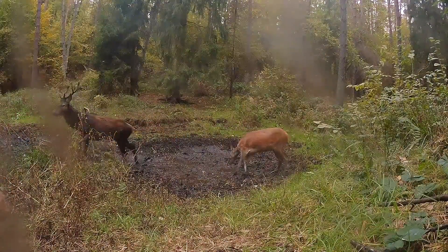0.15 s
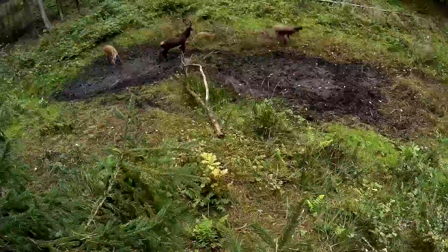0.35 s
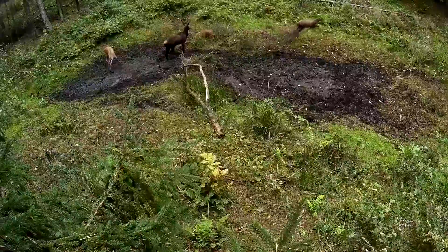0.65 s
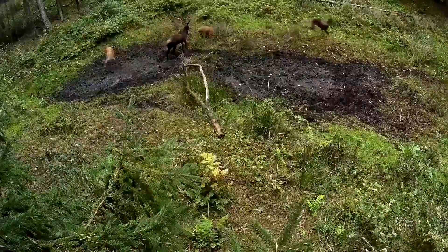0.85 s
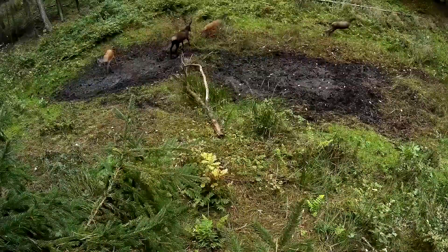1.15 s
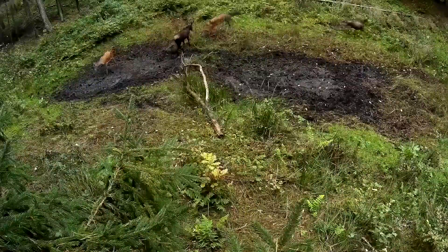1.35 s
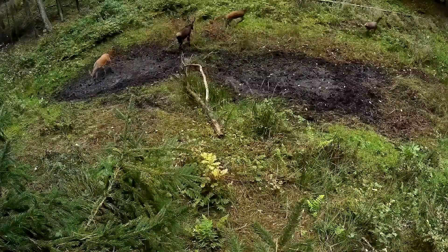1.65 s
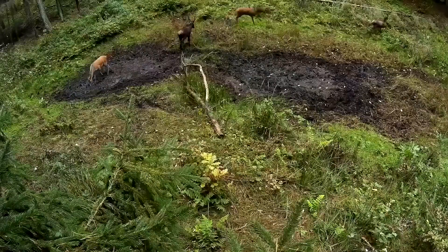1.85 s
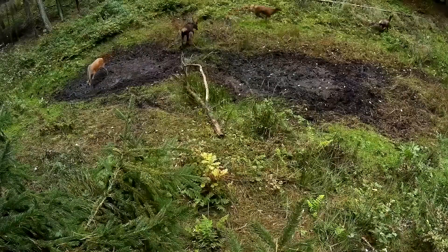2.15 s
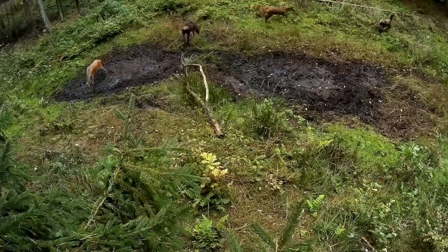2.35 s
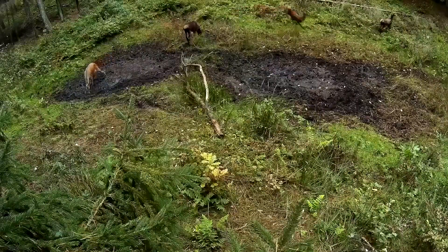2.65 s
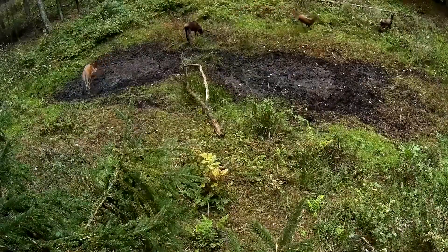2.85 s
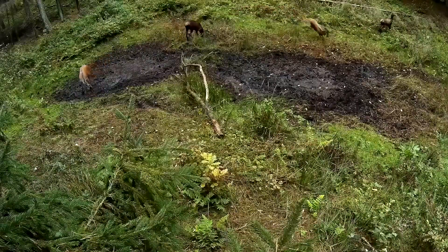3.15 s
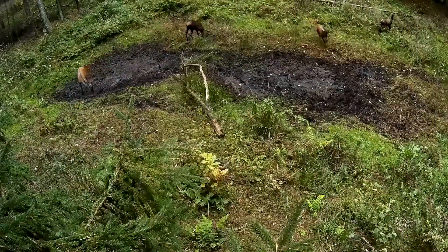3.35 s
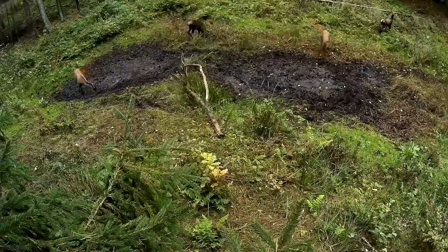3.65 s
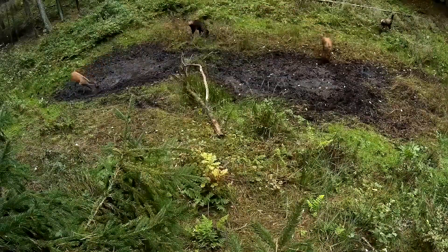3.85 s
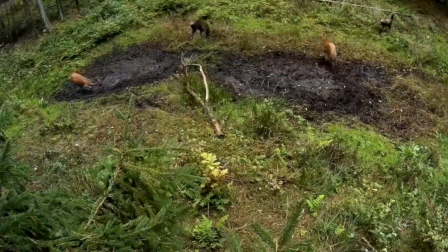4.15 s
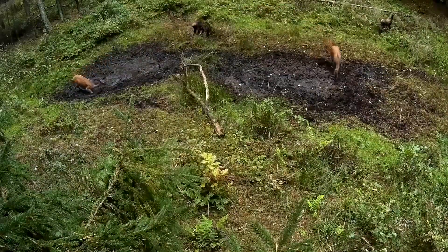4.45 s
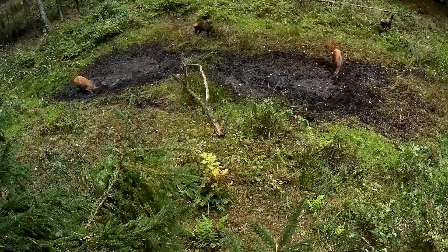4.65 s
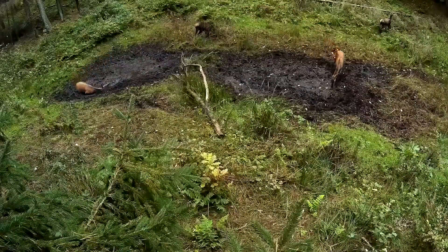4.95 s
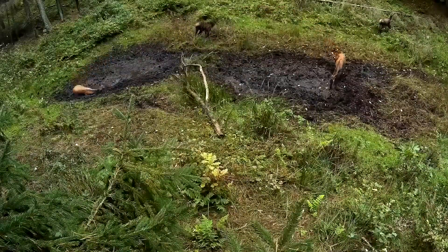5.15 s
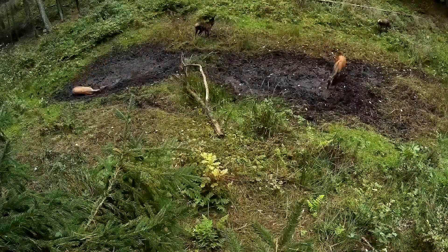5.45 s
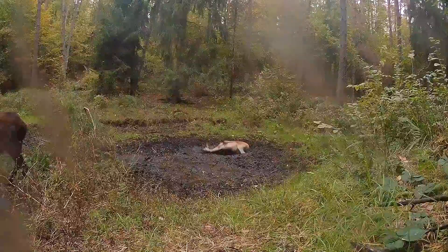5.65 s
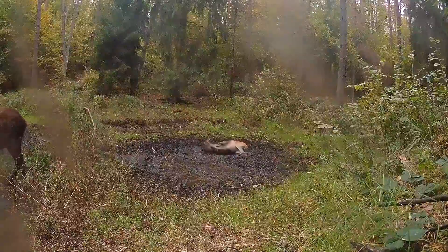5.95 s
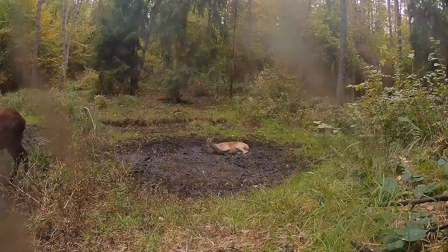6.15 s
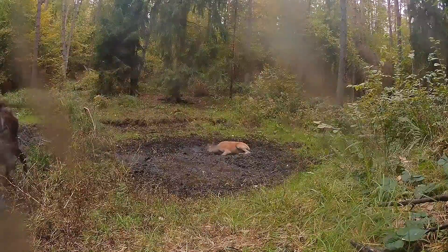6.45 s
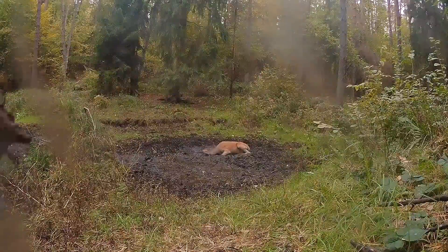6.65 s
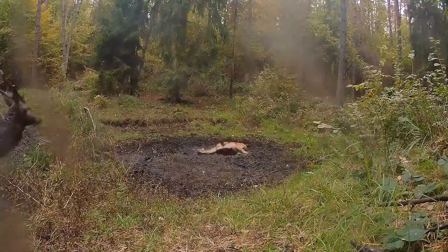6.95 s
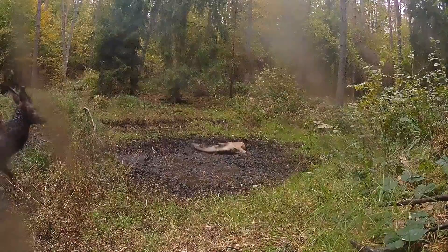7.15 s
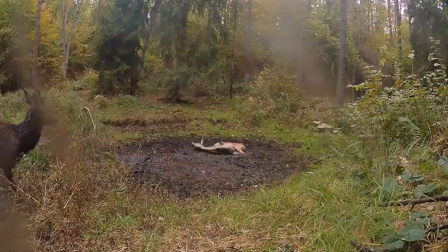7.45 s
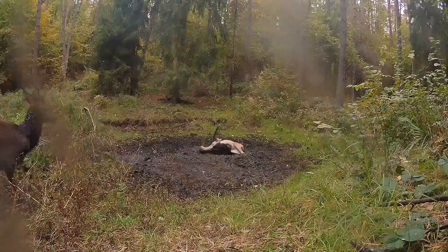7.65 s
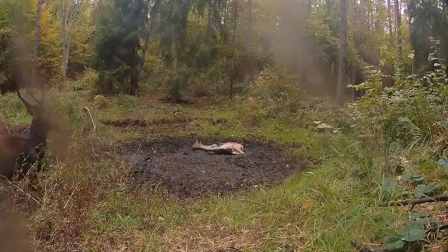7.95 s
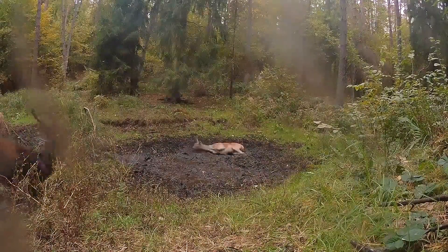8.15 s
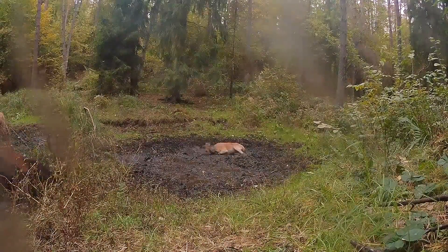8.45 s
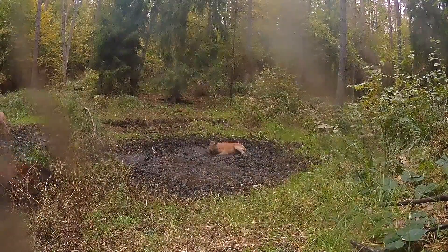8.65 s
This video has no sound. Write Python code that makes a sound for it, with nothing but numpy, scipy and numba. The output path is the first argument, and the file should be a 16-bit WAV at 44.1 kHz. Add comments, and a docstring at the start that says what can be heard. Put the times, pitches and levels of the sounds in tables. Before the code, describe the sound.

Wet, crackly movement of deer stepping, lying down and rolling in mud. Hard cracks come first with busy plopping, then a quieter stretch of fine rustling, ticks and small squelches, then stronger snaps and a hollow pocket knock, ending in dense crackling and bubbling. Open woodland with only a short scatter from the trunks; a small camera microphone adds steady hiss and a faint low buzz, dipping after loud hits.

```python
"""Deer step, lie down and roll in a muddy forest wallow, heard by a small fixed camera nearby.
Twigs and stalks snap and air pockets plop as volleys of damped rings; single gliding rings make singing
bubbles, short high droplet blips and one hollow pocket knock; pressed mud squelches in dense tiny rings.
Wet litter rustles as random ticks through resonances, over gurgling clusters of rings.
The camera adds a frame-rate buzz and hiss, ducks after loud sounds and clips the loudest snaps."""
import sys
import numpy as np
from scipy import signal
from scipy.fft import rfft, irfft
from scipy.io import wavfile
from scipy.ndimage import uniform_filter1d
from numba import njit

SR = 44100
rng = np.random.default_rng(int(sys.argv[2]) if len(sys.argv) > 2 else 0)


def waveform_to_disk(signal):
    """Save audio, clipped to [-1, 1], as 16-bit WAV at the path in sys.argv[1]."""
    frames = np.transpose(np.atleast_2d(signal))
    scaled = np.clip(frames, -1, 1) * 32767
    samples = np.round(scaled).astype(np.int16)
    wavfile.write(sys.argv[1], SR, samples)


N = 388505
TOP_HZ = 14600  # upper edge of the camera's sound
LEAD_S = .05  # room before the peak of a burst
RISE_SHARE = .05  # longer breaks build longer, by this share of their decay


def undb(db):
    """Decibels to amplitude."""
    return 10 ** (np.asarray(db) / 20)


def unit(x):
    """Scale to rms 1."""
    return x / np.sqrt(np.mean(x ** 2))


def band(x, hz, width):
    """Resonant band-pass, gain 1 at the centre."""
    b, a = signal.iirpeak(min(hz, .45 * SR), hz / width, fs=SR)
    return signal.lfilter(b, a, x)


@njit
def grains(n, start, hz, t60, size, rise, glide):
    """Damped rings that swell for rise cycles and slide in pitch by the share glide over their life."""
    y = np.zeros(n)
    for k in range(len(start)):
        life = int(t60[k] * SR) + 2
        step = np.exp(2j * np.pi * hz[k] / SR - np.log(1000.) / life)  # turn and decay per sample
        bend = np.exp(2j * np.pi * glide * hz[k] / SR / life)
        swell = np.exp(-hz[k] / (rise * SR))
        z, gate, first = size[k] + 0j, 1., int(start[k] * SR)
        for i in range(first, min(first + life, n)):
            z, step, gate = z * step, step * bend, gate * swell
            y[i] += z.imag * (1 - gate)
    return y


@njit
def follow(x, attack, release):
    """Level detector: quick up, slow down."""
    level, out = 0., np.empty(len(x))
    for i in range(len(x)):
        level += (abs(x[i]) - level) * (attack if abs(x[i]) > level else release)
        out[i] = level
    return out


def burst(hz, rise_ms, t60_ms, spread, cycles, glide, count):
    """One break as a volley of short rings that builds, then dies away; peak 1, close to LEAD_S."""
    u, g = rng.random((count, 3)).T, rng.standard_normal(count)
    early = u[2] < .3
    ms = np.where(early, -1.5 * rise_ms, .6 * t60_ms) * u[0] ** 1.5
    db = np.where(early, 12 * ms / rise_ms, -60 * ms / t60_ms)
    pitch = np.clip(hz * np.exp(spread * g), 120, TOP_HZ)
    sign = np.sign(u[1] - .5)
    size = sign * undb(db) * pitch / hz  # long low rings start weaker, so the colour stays at hz
    start = np.maximum(LEAD_S + ms / 1000 - 1 / pitch, 0)
    y = grains(int(.2 * SR), start, pitch, cycles / pitch, size, 0.41, glide)
    return y / np.abs(y).max()


def add(out, s, y):
    """Mix y into out from time s."""
    i = int(s * SR)
    y = y[max(-i, 0):len(out) - i]
    out[max(i, 0):max(i, 0) + len(y)] += y


def crackle(rate, scatter_db):
    """Clicks at random moments, rate a second on average, a few much larger than the rest."""
    clicks = (rng.random(N) < rate / SR) * rng.standard_normal(N)
    return clicks * undb(scatter_db * rng.exponential(size=N))


def flicker(rate, depth_db):
    """Gain that wanders rate times a second."""
    k = int(SR / rate)
    steps = np.repeat(rng.standard_normal(N // k + 1), k)[:N]
    return undb(depth_db * uniform_filter1d(steps, k))


# twigs and stalks breaking: start_s (of the peak) [s], level_db (peak of the ringing volley) [dB],
# pitch_hz (ring centre) [Hz], decay_ms (t60, at least 3 is used) [ms], crack_db (treble, re level) [dB]
BREAKING_TWIGS = [(0.015, -26, 4840, 8.8, 3.5), (0.082, -24, 2340, 42, 1), (0.2017, -19, 3100, 4.6, -7),
                  (0.217, -24, 1850, 17, -20), (0.4162, -23.5, 2700, 35, -4), (0.462, 2, 4776, 10.6, -9),
                  (0.633, -34, 3520, 13, -3), (0.7214, -20.5, 7230, 7, 1), (0.744, -18, 5580, 12, -7),
                  (0.7685, -25.5, 4220, 29, -8), (0.909, -32, 5400, 11, -10), (1.116, -23.5, 4340, 68, 4.5),
                  (1.1284, -24, 4500, 18, -10), (1.1442, -29, 4240, 17, -19), (1.1594, -17, 5460, 23, -15),
                  (1.1663, 0, 5460, 23.6, -17), (1.209, -21, 5900, 13.6, -17), (1.3222, -27, 5450, 14, -17),
                  (1.348, -18, 6730, 3.9, -21), (1.4102, -22, 4600, 8.3, -6), (1.4233, -30, 5700, 16, -5),
                  (1.47, -21, 4270, 7.1, -1.5), (1.5733, -21, 5200, 24, -23), (1.698, -18, 4870, 23.5, -5),
                  (1.92, -28, 3600, 34, -18), (1.957, -27, 4400, 33, -23), (1.848, -29.5, 5050, 17, -8),
                  (2.043, -29.5, 4800, 17.5, 4), (2.191, -33, 4300, 10, -15), (2.46, -26.5, 4450, 10, -6),
                  (2.3762, -26.5, 4320, 15, -6.5), (2.54, -24, 3530, 19, -13),
                  (2.5548, -23.5, 5500, 13.5, -1), (2.611, -25, 4370, 26, 3), (2.717, -28.5, 2410, 10, -24),
                  (2.84, -34, 4320, 18, -18), (2.867, -21, 3870, 8, -24), (3.052, -26.5, 4500, 50, -9),
                  (3.1339, -25, 5700, 24, -3), (3.3903, -16.5, 4320, 26, -8), (3.4048, -29, 3940, 80, -22),
                  (3.4578, -25.5, 5980, 14, 1), (3.7906, -18.5, 5330, 49, -14),
                  (4.1382, -20.5, 4520, 58, 0), (4.5568, -20.5, 3970, 30, -12),
                  (4.5804, -17.5, 4200, 13.7, -3), (4.632, -24.5, 4280, 17, -17),
                  (4.7007, -22, 3510, 12, -7), (4.779, -13.5, 5500, 7.1, -30),
                  (5.0639, -21.5, 3970, 21, -9), (5.0764, -26, 5440, 17, -23), (5.182, -28, 6400, 32, -13),
                  (5.5254, -35, 3640, 7.8, -7), (5.5378, -23, 3780, 21, -27),
                  (5.5773, -21.5, 4200, 13, -28), (6.666, -30, 3300, 22, -20),
                  (5.5919, -16.5, 2560, 14, -8), (5.709, -27.5, 1750, 43, -26.5),
                  (5.64, -28.5, 6350, 11, -16), (5.758, -28, 2920, 35, -11), (5.672, -33, 1800, 22, -16),
                  (5.794, -25.5, 2300, 30, -20), (5.801, -22, 4270, 26.5, -1), (5.817, -24.5, 4100, 77, -5),
                  (5.853, -31, 4660, 15, -13), (5.8771, -9.5, 5460, 14.1, -3), (6.0068, 1, 2650, 8, -7),
                  (6.1908, -2.5, 4000, 12.9, -3), (6.3077, -27, 7900, 11, 7), (6.3315, -8, 4460, 6.7, -1),
                  (6.425, -24, 4530, 33, -21), (6.6868, -18, 5230, 22.6, -9), (6.829, -24, 6530, 27, -2.5),
                  (6.968, -32.5, 2360, 30, -15), (7.148, -43, 2250, 22, -25),
                  (6.9993, -15, 5170, 26.4, -21), (7.008, -19.5, 3700, 19.4, -16.5),
                  (7.06, -24.5, 6260, 17, -6), (7.286, -23, 4370, 37, -7), (7.3099, -22.5, 3500, 24, -8),
                  (7.4094, -18.5, 4930, 6.1, -3.5), (7.4548, -18, 3070, 11.2, -8),
                  (7.468, -21, 3920, 16.6, -3), (7.485, -30, 3960, 11, -19), (7.509, -21.5, 3470, 30, -9),
                  (7.5596, -30, 2300, 13, -20), (7.619, -27.5, 3700, 20, -21), (7.674, -24, 3720, 15.3, -2),
                  (7.8223, -11.5, 6520, 7.3, 1.5), (7.8365, -16, 4360, 35, -3),
                  (7.978, -23.5, 5880, 16, -22), (8.1044, -17.5, 5260, 17.3, -0.5),
                  (8.234, -20, 6800, 9.1, -24), (8.3012, -22.5, 4100, 10, -1.5),
                  (8.3148, -15, 3700, 4.4, -12), (8.347, -20, 4530, 11, -18),
                  (8.453, -15.5, 4710, 14, -28.5), (8.49, -21.5, 3360, 23, -9),
                  (8.528, -22.5, 3400, 27, -28), (8.617, -19.5, 4160, 19, -25),
                  (8.633, -17, 5160, 46, -7.5), (8.641, -31, 2100, 21, -27), (8.72, -33, 2230, 40, -25),
                  (8.665, -23.5, 4050, 27, -15), (8.697, -15, 4600, 7.6, -9)]


def snaps():
    """Fibres give way one after another: a ringing volley and a short treble crack."""
    out = np.zeros(N)
    for start_s, level_db, pitch_hz, decay_ms, crack_db in BREAKING_TWIGS:
        rise_ms = max(.8 + RISE_SHARE * decay_ms, .2)
        decay_ms = max(decay_ms, 3)
        body = burst(pitch_hz, rise_ms, decay_ms, spread=.24, cycles=12.8, glide=0.026, count=40)
        crack = burst(9000, 1.1 * rise_ms, decay_ms, spread=0.2, cycles=3.64, glide=0., count=60)
        add(out, start_s - LEAD_S, undb(level_db) * (body + undb(crack_db) * crack))
    return out


# air pockets bursting as hooves and flanks leave the mud: start_s (of the peak) [s],
# level_db (before the mix of three layers) [dB], pitch_hz [Hz], decay_ms (t60, at least 6 is used) [ms]
AIR_POCKETS = [(0.1474, -29.5, 515, 34), (0.268, -37, 480, 40), (.311, -38, 480, 30),
               (0.4168, -21, 980, 27), (.419, -28, 487, 35), (0.4634, -19, 990, 19), (.619, -40.5, 277, 27),
               (1.066, -29, 620, 34), (1.116, -24, 950, 72), (1.1648, -17, 1120, 16),
               (1.125, -22, 1160, 25.7), (1.252, -31, 665, 69), (1.4618, -30.5, 556, 27),
               (1.4783, -29, 920, 54), (1.4974, -29.5, 780, 40), (1.574, -22, 830, 17.3),
               (1.6045, -26.5, 1200, 19), (1.697, -20.5, 852, 37), (1.961, -40, 300, 31),
               (2.281, -34, 644, 36), (2.0937, -30, 546, 19), (2.1551, -31.5, 480, 44),
               (2.303, -30.5, 570, 26), (2.909, -33.5, 690, 19), (3.05, -31, 795, 38),
               (3.0682, -30, 663, 5.6), (3.45, -34.5, 793, 29), (3.756, -41, 446, 36),
               (3.793, -34, 980, 29), (4.139, -33.5, 1440, 16), (4.17, -41, 860, 28), (4.41, -33, 1350, 28),
               (4.4187, -30, 730, 22.4), (4.5352, -27, 550, 73), (4.581, -29.5, 645, 9),
               (4.811, -30.5, 420, 43), (5.0249, -28.5, 830, 32.6), (5.496, -35, 1060, 31),
               (5.5937, -29.5, 1180, 14), (5.621, -38, 1040, 40), (5.672, -34.5, 1150, 29),
               (5.8024, -31.5, 533, 35), (5.82, -35.5, 500, 55), (5.8776, -21, 1880, 15.7),
               (6.009, -20, 527, 13), (6.0574, -29, 1030, 35), (6.27, -39.5, 510, 40),
               (6.43, -33, 840, 27.6), (6.5082, -30.5, 680, 54), (6.6114, -23, 800, 33),
               (6.6864, -27.5, 1100, 10.4), (7.0062, -30, 958, 30), (7.009, -23, 2050, 20),
               (7.0751, -34, 720, 19), (7.1456, -31.5, 940, 17.4), (7.188, -27, 1060, 18),
               (7.3123, -35.5, 463, 35), (7.259, -37, 1110, 22), (7.455, -26, 1440, 9.7),
               (7.4684, -32, 945, 30), (7.5114, -28.5, 1150, 11.7), (7.659, -39, 910, 28),
               (7.816, -32, 910, 15), (7.838, -26.5, 604, 19), (7.9994, -34, 1030, 17),
               (8.103, -33.5, 675, 47), (8.316, -33.5, 443, 22.6), (8.43, -38.5, 1100, 18),
               (8.665, -39, 1300, 14), (8.4905, -18, 930, 17), (8.492, -23.5, 440, 30),
               (8.53, -38, 905, 28), (8.7, -35, 830, 37)]


def plops():
    """A cavity breaks into many pockets: it rings at its pitch, in a near core and a wide, rough slurp."""
    out = np.zeros(N)
    for start_s, level_db, pitch_hz, decay_ms in AIR_POCKETS:
        rise_ms = max(1.48 + RISE_SHARE * decay_ms, .5)
        decay_ms = max(decay_ms, 6)
        cavity_cycles = .6 * pitch_hz * decay_ms / 1000
        cavity = burst(pitch_hz, rise_ms, .3 * decay_ms, spread=.04, cycles=cavity_cycles,
                       glide=.15, count=3)
        core = burst(pitch_hz, rise_ms, decay_ms, spread=0.17, cycles=7.8, glide=0.29, count=10)
        slurp = burst(pitch_hz, 1.59 * rise_ms, 1.8 * decay_ms, spread=0.51, cycles=10.7,
                      glide=0.3, count=40)
        plop = undb(-5.5) * cavity + undb(-2.5) * core + undb(-5.5) * slurp
        add(out, start_s - LEAD_S, undb(level_db) * plop)
    return out


# single gliding rings (singing bubbles, short high droplet blips and one hollow pocket knock):
# start_s [s], level_db (before swell and decay) [dB], pitch_hz (at the start) [Hz],
# decay_s (t60) [s], swell_cycles [cycles], glide (pitch change over the decay) [share of the pitch]
SINGLE_RINGS = [(2.716, -36, 764, 0.065, 1.7, 0.1), (2.745, -52.5, 846, 0.073, 4, -3),
                (6.0058, -3.5, 1430, 0.031, 0.46, 0.2), (6.619, -33, 490, 0.17, 6.9, 1),
                (7.206, -24, 726, 0.052, 8.5, 2), (8.048, -27, 4730, 0.02, 5, .0),
                (8.069, -29, 3900, .018, 5, -0.5), (7.348, -32.5, 740, 0.05, 1.8, 1),
                (8.705, -43.5, 389, 0.27, 10, 0.7), (8.755, -39, 470, 0.2, 15, -0.2)]


def gliding_rings():
    """A bubble, droplet or pocket is one gliding ring; thick mud chokes it, so longer ones waver more."""
    out = np.zeros(N)
    waver = flicker(90, depth_db=5)
    for start_s, level_db, pitch_hz, decay_s, swell_cycles, glide in np.array(SINGLE_RINGS):
        start, pitch, decay, size = np.array([[start_s], [pitch_hz], [decay_s], [undb(level_db)]])
        ring = grains(N, start, pitch, decay, size, swell_cycles, glide)
        out += waver ** min(decay_s / .1, 1) * ring
    return out


# mud pressed out under a hoof or flank: start_s [s], length_s [s], level_db (rms) [dB], pitch_hz [Hz]
PRESSED_MUD = [(1.464, 0.05, -36, 3500), (2.045, 0.031, -42, 4600), (2.277, .03, -39.5, 3900),
               (2.606, .016, -33.5, 4370), (8.097, 0.013, -35, 4170), (2.835, 0.053, -43.5, 4300),
               (3.396, 0.042, -41.5, 3930), (5.501, 0.031, -46, 3930), (5.759, 0.099, -40, 4040),
               (6.325, 0.038, -39.5, 4000), (6.494, .045, -44, 3850), (7.438, 0.067, -45.5, 3760),
               (8.295, 0.057, -38.5, 4050), (8.517, 0.02, -39, 3650), (8.617, 0.028, -38, 4220)]


def squelches():
    """Pressed mud spits a dense run of tiny pockets near one pitch, then stops short."""
    out = np.zeros(N)
    for start_s, length_s, level_db, pitch_hz in PRESSED_MUD:
        u, g = rng.random(120), rng.standard_normal((120, 2)).T
        pitch = pitch_hz * np.exp(0.13 * g[0])
        size = undb(8.3 * g[1] - 4 * u)  # uneven pockets, weaker towards the end
        y = grains(int(.2 * SR), length_s * u, pitch, 22 / pitch, size, 0.77, 0.14)
        rms = np.sqrt(np.sum(y ** 2) / (length_s * SR))
        add(out, start_s, undb(level_db) * y / rms)
    return out


# steps and rolls through mud, grass and wet litter, levels before the layer trims in rustle():
# start_s (of the peak) [s], fade_s (to fall 10 dB, at least 0.01 is used) [s],
# gurgle_db [dB], stalks_db [dB], spray_db [dB]
STEPS_AND_ROLLS = [(0.03, 0.08, -42.5, -37.5, -40), (0.16, 0.12, -60, -36.5, -33.5),
                   (0.33, 0.5, -50, -59.5, -65), (0.568, 0.01, -74, -34, -30), (0.64, -0.2, -58, -37, -53),
                   (0.73, 0.37, -55, -42, -43), (0.81, -3.5, -74, -55, -53), (0.92, 0.7, -62, -59, -48),
                   (1.1, 0.17, -48, -45, -43), (1.35, 0.5, -72, -62, -48), (1.476, 0.03, -34.5, -35, -37.5),
                   (1.59, .08, -45.5, -41.5, -39), (1.8, -0.84, -55, -45.5, -42.5),
                   (1.938, 0.22, -54, -46, -44.5), (2.06, 0, -52.5, -36, -44),
                   (2.167, 0.07, -51, -40.5, -39.5), (2.291, 0.07, -43, -43.5, -43),
                   (2.4, -0.33, -46, -39, -42), (2.51, 0.14, -52.5, -38.5, -35.5),
                   (2.65, 0.1, -53, -43.5, -46), (2.85, 0.07, -53.5, -47, -44.5),
                   (2.911, -0.0734, -38, -34.5, -32.5), (3.069, -0.04, -49, -43, -54),
                   (3.13, 0.2, -67, -56, -47.5), (3.402, -0.09, -46, -38, -57), (3.47, 0.07, -48, -40, -38),
                   (3.62, 0.63, -58.5, -49, -45), (3.76, 0, -43.5, -47.5, -40),
                   (3.95, 0.19, -47.5, -44.5, -41.5), (4.16, 0.15, -48, -48, -39),
                   (4.409, 0.1, -49, -45, -37), (4.54, 0.15, -61, -49, -43.5),
                   (4.798, 0.2, -49.5, -43.5, -41), (5.019, -0.21, -47, -36, -54),
                   (5.19, -0.13, -50, -45, -36), (5.32, 0, -61, -47, -37), (5.39, 0.15, -48, -44.5, -47),
                   (5.52, 0.53, -52.5, -57, -77), (5.62, 0.28, -51.5, -55, -52),
                   (5.766, -0.05, -41, -35.5, -37.5), (5.82, 0.04, -43, -47, -37.5),
                   (6.06, 0.22, -44, -43.5, -52), (6.131, -0.1, -52, -36, -34),
                   (6.29, -0.09, -39, -34, -35), (6.35, 0.17, -54.5, -45, -43),
                   (6.45, 0.16, -56, -48, -41.5), (6.519, 0.13, -53, -38.5, -66),
                   (6.6, 0.05, -45, -45, -45), (6.69, 0.11, -49.5, -39, -44.5),
                   (7.01, 0.1, -43.5, -42, -39), (7.15, 0.17, -47.5, -42, -43.5),
                   (7.279, -0.01, -39, -37, -33.5), (7.459, 0.09, -49.5, -38, -41.5),
                   (7.661, 0.13, -45, -43, -44.5), (7.75, -0.04, -47.5, -42, -41),
                   (7.828, 0.1, -49, -37.5, -40), (7.88, 0.1, -72, -62, -44),
                   (7.99, -0.42, -71, -45, -38.5), (8.12, 0.13, -65, -47, -42),
                   (8.19, -0.03, -49, -50, -37), (8.328, 0.15, -57, -56, -48),
                   (8.411, 0.16, -58, -43, -38.5), (8.49, 0.1, -43, -43, -56), (8.63, 0.3, -56, -47, -52),
                   (8.7, 0, -49, -36, -47)]
# quiet bed between movements, before the same trims: gurgle_db [dB], stalks_db [dB], spray_db [dB]
QUIET_BED = [-68, -57.5, -51]
SWELL_SHARE = 0.73  # a movement swells in this share of its fade


def moves():
    """Levels in dB of gurgle, stalks and spray: each movement swells and fades over a quiet bed."""
    t = np.arange(0, N / SR + .01, .002)
    power = 0
    for start_s, fade_s, *levels_db in STEPS_AND_ROLLS:
        distance = np.where(t < start_s, (start_s - t) / SWELL_SHARE, t - start_s)
        lost_db = 10 * (distance / max(fade_s, .01))
        power = power + undb(np.array(levels_db)[:, None] - lost_db) ** 2
    level_db = 10 * np.log10(power + undb(QUIET_BED)[:, None] ** 2)
    return [np.interp(np.arange(N) / SR, t, db) for db in level_db]


def smacks(low_hz, span, cycles, scatter_db, spread_ms, count, size):
    """Small wet breaks at random moments, each a cluster of rings near its own pitch; rms 1."""
    u, v = rng.random((count, 3)).T, rng.random((count, size, 3))
    start = u[0, :, None] * N / SR + spread_ms / 1000 * v[..., 0] ** 2
    hz = low_hz * span ** u[1, :, None] * np.exp(.5 * (v[..., 1] - .5))
    smack_db = np.minimum(-scatter_db * np.log(u[2, :, None]), 7)  # few are large, none beyond a cap
    db = smack_db - 3.9 * v[..., 0]
    gain = undb(db) * np.sqrt(hz / low_hz)  # short high rings carry as much energy as long low ones
    t60 = cycles * (0.37 + v[..., 2]) / hz
    return unit(grains(N, start.ravel(), hz.ravel(), t60.ravel(), gain.ravel(), 0.3, 0.26))


def gurgle():
    """Bubbles in the mud: a froth of single rings and clusters of longer ones."""
    froth = smacks(210.7, 9.3, cycles=7.3, scatter_db=4.5, spread_ms=3.05, count=5000, size=1)
    clusters = smacks(428.3, 4.45, cycles=35.4, scatter_db=4.0, spread_ms=14, count=800, size=3)
    return undb(-5) * froth + undb(-5.5) * clusters


def ringing_ticks(modes, shared, fine_db):
    """Dense ticks of stalks or droplets ring resonances, each with its own ticks besides the shared."""
    layer = 0
    for pitch_hz, width_hz, level_db in modes:
        own = crackle(2500, scatter_db=2.0) * flicker(60, depth_db=1.5) * flicker(13, depth_db=1.0)
        ring = unit(band(band(shared + own, pitch_hz, width_hz), pitch_hz, width_hz))
        treble_db = fine_db * max(np.log2(pitch_hz / 6500), 0)
        layer = layer + undb(level_db + treble_db) * ring
    return layer


def swish():
    """One bright sweep through dry grass tips: a bell-shaped swell of high band noise."""
    swell = np.exp(-((np.arange(N) / SR - 2.5) / 0.083) ** 2)
    return undb(-43) * swell * unit(band(rng.standard_normal(N), 11000, 6000))


# where brushed stalks ring at the camera's port: pitch_hz [Hz], width_hz (of each of two passes) [Hz],
# level_db (within the layer) [dB]
STALK_RINGS = [(2140, 780, -2.5), (3490, 830, 0), (4540, 700, -1.5)]
# where fine spray rings there: pitch_hz [Hz], width_hz (of each of two passes) [Hz],
# level_db (within the layer, before the treble opens) [dB]
SPRAY_RINGS = [(5150, 2200, 0.5), (6720, 2800, -1.5), (8830, 4400, -4.5), (12000, 1200, -14)]


def rustle():
    """Gurgle, wet smacks, and ticks of stalks and droplets follow the movements and surge together."""
    gurgle_db, stalks_db, spray_db = moves()
    shared, surge = crackle(1500, scatter_db=2.0), flicker(60, depth_db=2.5)
    stalk_smacks = smacks(3000, 1.9, cycles=20, scatter_db=3.5, spread_ms=3.0, count=1600, size=4)
    spray_smacks = smacks(4460, 2.22, cycles=32.0, scatter_db=3.5, spread_ms=5.0, count=1300, size=9)
    fine_db = .5 * (spray_db - stalks_db)  # where spray outweighs stalks the top octave opens
    out = undb(gurgle_db) * gurgle()
    out += undb(stalks_db - 5) * stalk_smacks
    out += undb(spray_db - 12.5) * spray_smacks
    out += undb(stalks_db - 8.5) * ringing_ticks(STALK_RINGS, shared, fine_db)
    out += undb(spray_db - 7) * ringing_ticks(SPRAY_RINGS, shared, fine_db)
    return surge * (out + swish())


def buzz():
    """Supply current switches on and off once a frame and leaks in as a down and an up spike."""
    frame_hz, load_on_s, load_off_s = 29.97, .0099, .0202
    t = np.arange(N) / SR
    spikes = 0
    for at, sign in ((load_on_s, -1), (load_off_s, .88)):
        since = (t - at) % (1 / frame_hz)
        spikes = spikes + sign * (np.exp(-since / 0.0014) - np.exp(-since / 0.0005))
    level_db = -37.5 - 2.5 * (t > 6.2)  # the buzz is weaker from 6.2 s on
    return undb(level_db) * spikes * flicker(36, depth_db=2.5)


# colour of the camera's steady hiss: pitch_hz [Hz], level_db (relative density per Hz) [dB]
HISS_COLOUR = [(59, -23), (100, 9.5), (137, 9), (188, -8.5), (1530, 1.5), (5260, 0.5), (13000, -7),
               (14100, 2), (15000, -50)]


def hiss():
    """Noise shaped along the colour curve, at a steady rms of -56 dB."""
    pitch_hz, level_db = np.transpose(HISS_COLOUR)
    f = np.arange(N // 2 + 1) * SR / N + 1
    colour = undb(np.interp(np.log(f), np.log(pitch_hz), level_db))
    return undb(-56) * unit(irfft(rfft(rng.standard_normal(N)) * colour, N))


def trunk_scatter(hits):
    """Trunks scatter the hits: a short decaying noise tail of unit energy."""
    t = np.arange(int(.15 * SR)) / SR
    trunks = rng.standard_normal(len(t)) * undb(-60 * t / 0.056) * (t > .002)
    return signal.fftconvolve(hits, trunks / np.sqrt(np.sum(trunks ** 2)))[:N]


def ground_bounce(near):
    """The ground path arrives just after the direct sound and hollows 1.6 and 2.6 kHz."""
    lag_s = .00096
    late = np.concatenate([np.zeros(int(lag_s * SR)), near])[:N]
    return 0.19 * band(late, 2250, 1600)


def scene():
    """Sources, a short scatter from trunks, a bounce off the ground, and the camera's own noise."""
    hits = snaps() + plops() + gliding_rings() + squelches()
    near = hits + undb(-12) * trunk_scatter(hits) + rustle()
    return (near + ground_bounce(near) + buzz() + hiss())[None]


def record(dry):
    """Gain control ducks after loud sounds, the converter clips, the top is cut."""
    attack_s, release_s, threshold_db = 0.0083, .15, -26.5
    loud = follow(dry[0], 1 / (attack_s * SR), 1 / (release_s * SR))
    gain = np.minimum(1, (undb(threshold_db) / (loud + 1e-9)) ** 0.65)
    clipped = np.clip(dry * gain, -.48, .48)
    return signal.sosfilt(signal.ellip(8, .2, 60, TOP_HZ, fs=SR, output="sos"), clipped)


dry = scene()
out = record(dry)
waveform_to_disk(out)
```